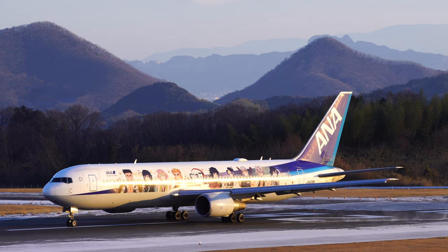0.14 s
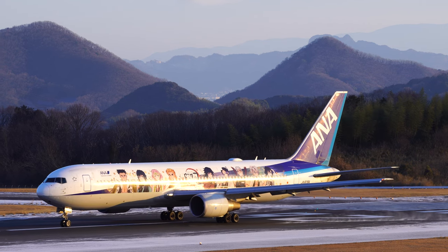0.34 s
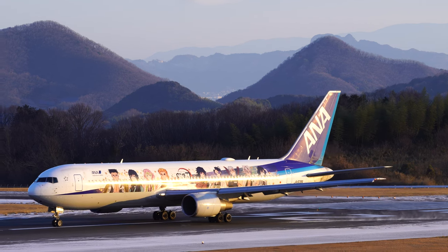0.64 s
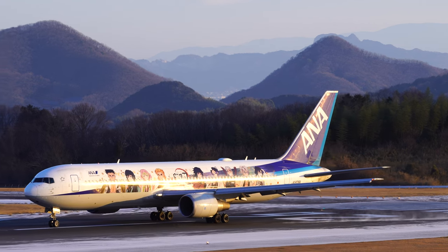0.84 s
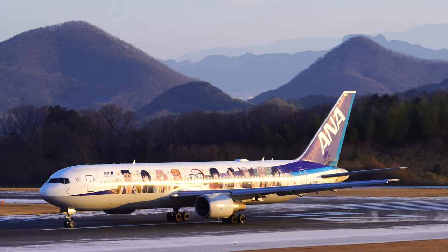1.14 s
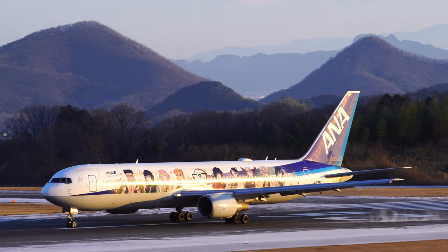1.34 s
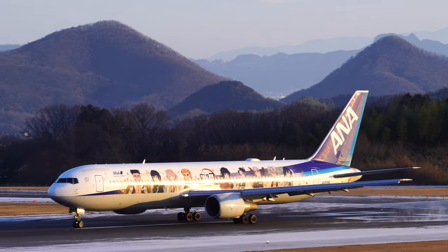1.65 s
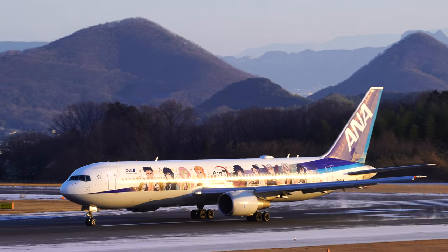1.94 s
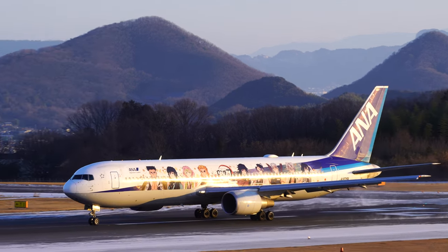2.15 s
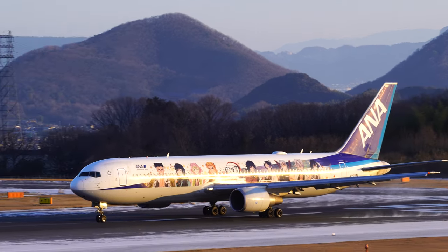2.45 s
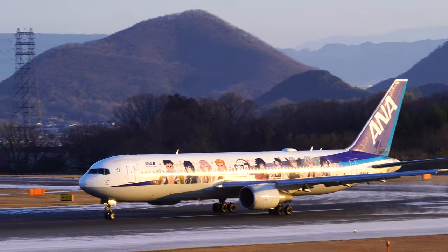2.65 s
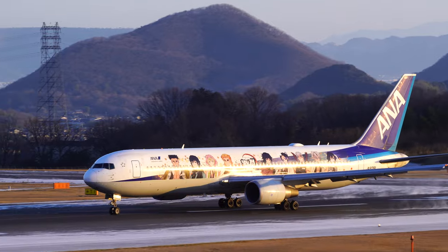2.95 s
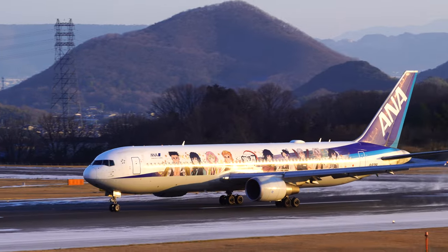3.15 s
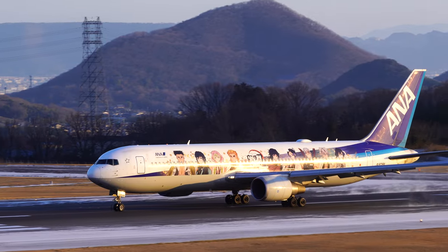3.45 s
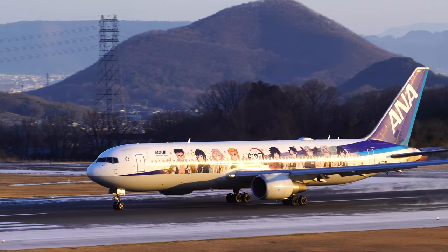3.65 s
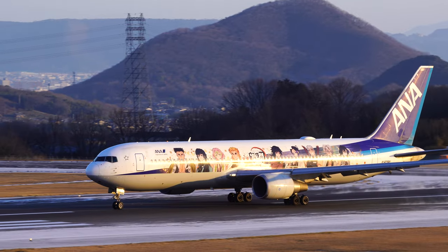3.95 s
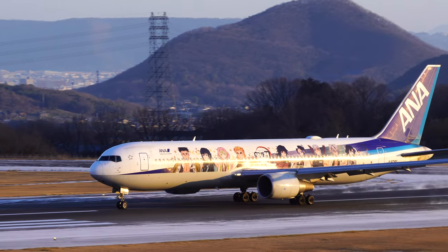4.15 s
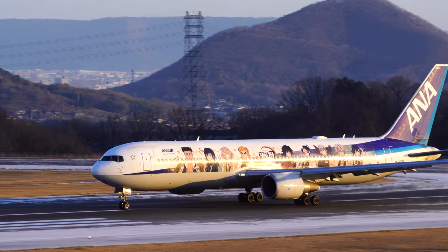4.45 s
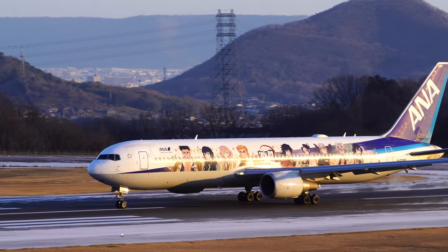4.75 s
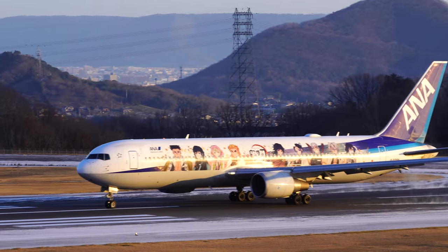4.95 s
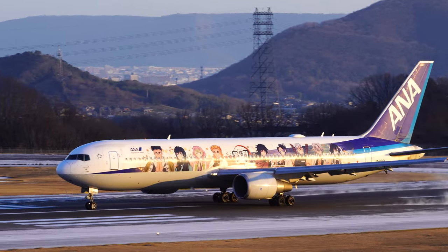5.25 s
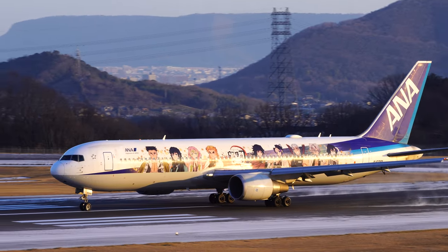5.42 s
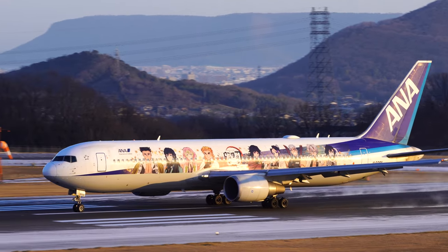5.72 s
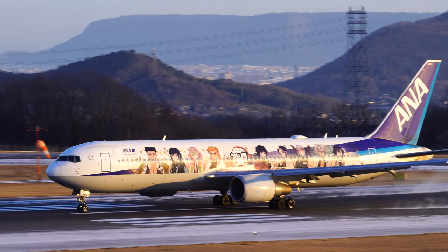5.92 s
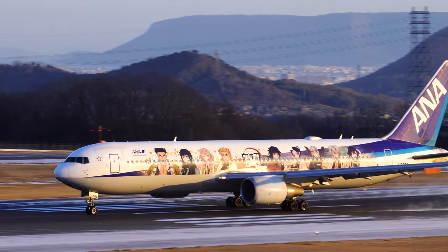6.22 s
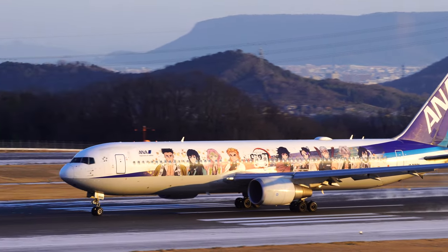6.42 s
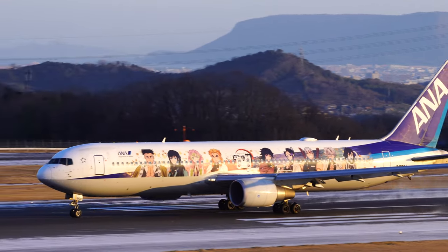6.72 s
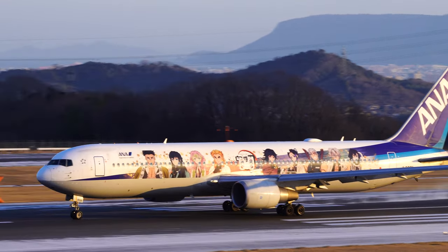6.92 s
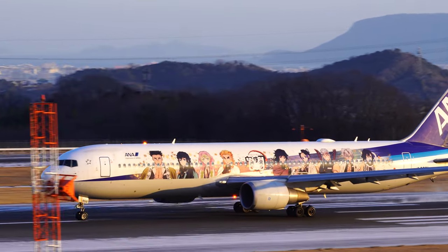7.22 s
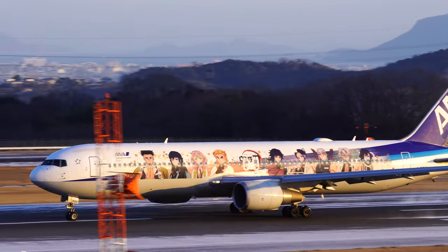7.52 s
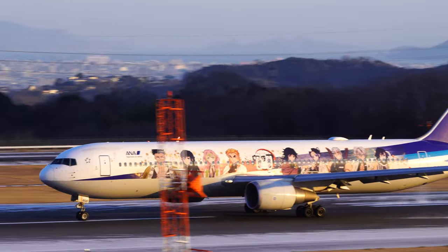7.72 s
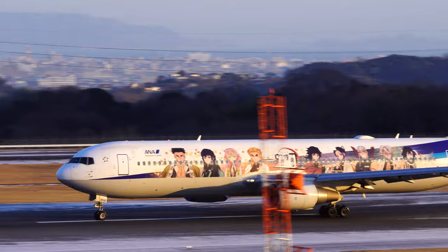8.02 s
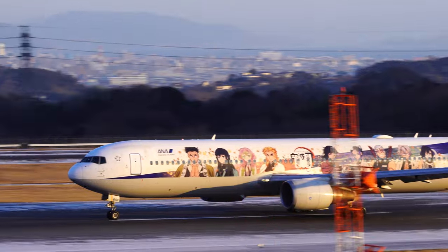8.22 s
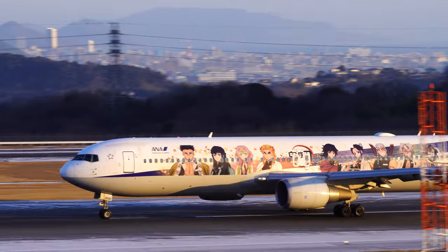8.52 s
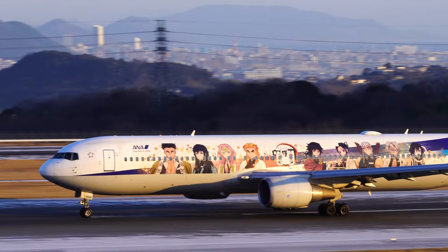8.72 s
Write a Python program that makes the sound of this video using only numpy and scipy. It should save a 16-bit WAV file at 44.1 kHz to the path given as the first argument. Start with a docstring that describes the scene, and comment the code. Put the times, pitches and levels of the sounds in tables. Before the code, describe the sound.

Outdoors across an open airfield, a jet airliner holds a high, fluttering engine whine over soft rushing air and a thin whistle. The throttles open; the whine surges, pulses hard and slides upward, then fades beneath a fuller, darker exhaust roar with low rumble. Heard from a distance by one microphone, mono, with very faint hiss.

```python
"""An open airfield, across which a distant twin-engine airliner opens its throttles. Turbulent mixing gives
rumble, jet roar and fan hiss as shaped noise; air absorption and ground echo colour this flow noise.
Harmonic tones of two fans beat against each other and climb, beside a compressor whistle and a shaft
order; eddies smear them all. A limiter ducks under the loudest beats, over faint preamplifier hiss."""
import sys
import numpy as np
from scipy import signal
from scipy.fft import rfft, irfft, next_fast_len
from scipy.io import wavfile
from scipy.ndimage import uniform_filter1d

SR = 44100
rng = np.random.default_rng(int(sys.argv[2]) if len(sys.argv) > 2 else 0)


def master(y):
    """Save y as 16-bit WAV."""
    cut = np.clip(np.atleast_2d(y).T, -1, 1)
    pcm = np.round(cut * 32767)  # scale
    wavfile.write(sys.argv[1], SR, pcm.astype(np.int16))


N = 391166


def amp(db):
    """Decibel law: 20 dB is a tenfold amplitude."""
    return 10 ** (np.asarray(db) / 20)


def unit(x):
    """Normalisation to an rms of 1."""
    return x / np.sqrt(np.mean(x ** 2))


def curves(rows, t):
    """Linear interpolation of each column after the first, at times t."""
    start_s, *columns = np.transpose(rows)
    return [np.interp(t, start_s, column) for column in columns]


def shaped(x, gain_db):
    """Time-varying filtering: short-time spectra times a gain in dB over frequency and time."""
    hz, t, spectra = signal.stft(x, SR, nperseg=1024, boundary="even")
    spectra = spectra * amp(gain_db(hz[:, None], t[None]))
    return signal.istft(spectra, SR, nperseg=1024)[1][:N]


def rush(spectrum, patchy_db):
    """Turbulent noise of rms 1: turbulence on the way makes drifting patches of gain."""
    corner_hz, density_db = np.transpose(spectrum)
    field = rng.standard_normal((513, N // 512 + 2))
    field = uniform_filter1d(field, size=12, axis=0)  # smooth over frequency
    field = unit(uniform_filter1d(field, size=9, axis=1))  # smooth over time

    def gain_db(hz, t):
        steady_db = np.interp(np.log(hz + 1), np.log(corner_hz), density_db, -120, -120)
        return steady_db + patchy_db * field[:, :t.size]

    return unit(shaped(rng.standard_normal(N), gain_db))


# Preamplifier noise spectrum. Each row: frequency in Hz, relative density in dB per Hz.
SELF_NOISE_SPECTRUM = [(20, -27), (5000, -4), (11000, 1), (15000, -7.5)]


def self_noise():
    """Electronic noise: a faint, mostly treble hiss added before the limiter."""
    return amp(-87) * rush(SELF_NOISE_SPECTRUM, patchy_db=.3)


# Low rumble spectrum. Each row: frequency in Hz, relative density in dB per Hz.
RUMBLE_SPECTRUM = [(12, -43), (20, -9.5), (54, 0), (76, 0), (103, -1), (178, -12.5), (230, -9.5),
                   (300, -36.5), (510, -120)]


def rumble():
    """Low-frequency flow noise, of rms 1."""
    return rush(RUMBLE_SPECTRUM, patchy_db=0.5)


# Fan hiss spectrum. Each row: frequency in Hz, relative density in dB per Hz.
HISS_SPECTRUM = [(900, -41), (1400, 0.5), (1900, 5), (2400, 0), (3000, -4.5), (4300, -16.5), (5000, -25.5),
                 (5900, -36.5), (7700, -55.5), (9500, -96)]


def fan_hiss():
    """Broadband fan noise, of rms 1."""
    return rush(HISS_SPECTRUM, patchy_db=0.6)


# Fan speed. Each row: time in seconds, blade tone midway between both fans in Hz.
FAN_SPEED = [(0, 1521.5), (.3, 1537), (.6, 1540.6), (2.0, 1540.6), (2.55, 1545), (3.15, 1556), (3.4, 1585),
             (3.6, 1637), (3.9, 1735), (4.8, 1984), (5.1, 2047), (5.4, 2091), (6.0, 2143), (6.77, 2167),
             (7.5, 2194), (8.87, 2207)]


def blade_hz(t):
    """Blade passing frequency: it follows the fan speed."""
    return curves(FAN_SPEED, t)[0]


# Exhaust roar spectra at idle and at thrust. Each row: frequency in Hz, relative density in dB per Hz.
IDLE_SPECTRUM = [(150, -62), (260, -15.5), (420, -8), (525, 2), (690, -1.5), (1100, -0.5), (1500, -5.5),
                 (2200, -30), (3000, -66)]
THRUST_SPECTRUM = [(150, -51), (260, -17.5), (355, -14.5), (560, -1), (800, -4.5), (1170, -7),
                   (1600, -13.5), (2200, -36), (3000, -66.5)]
# Upper roar that comes and goes. Each row: time in seconds, brightness in dB per octave.
ROAR_BRIGHTNESS = [(0, 2.5), (1.0, 3.5), (1.4, 0), (2.7, -0.5), (3.1, 1), (7.0, -1), (7.6, -4), (8.87, -6)]


def exhaust_roar(t):
    """Jet mixing noise: an equal-power crossfade to a darker spectrum as thrust rises."""
    thrust = np.clip((blade_hz(t) - 1750) / 380, 0, 1)
    idle = np.sqrt(1 - thrust) * rush(IDLE_SPECTRUM, patchy_db=0.75)
    full = np.sqrt(thrust) * rush(THRUST_SPECTRUM, patchy_db=0.62)

    def tilt_db(hz, s):
        octaves = np.clip(np.log2((hz + 1) / 720), -.45, .9)
        return curves(ROAR_BRIGHTNESS, s)[0] * octaves

    return shaped(idle + full, tilt_db)


# Air flow before the path. Each row: time in seconds, then gains of rumble, exhaust roar and fan hiss in dB.
FLOW_LEVELS = [(0, -41.5, -26.5, -29), (.8, -42.5, -27.5, -29.5), (1.5, -40, -25.5, -29),
               (2.4, -40, -26, -27), (2.8, -42, -27, -27.5), (3.7, -40, -26, -27.5), (4.3, -38.5, -25, -28),
               (4.9, -35.5, -20.5, -26.5), (5.6, -32, -19, -26), (6.4, -34, -19, -28),
               (7.4, -34.5, -18, -28), (8.2, -35.5, -20, -28.5), (8.87, -33.5, -21, -29)]


def flow(t):
    """Superposition of flow noises: rumble, exhaust roar and fan hiss."""
    rumble_db, roar_db, hiss_db = curves(FLOW_LEVELS, t)
    return amp(rumble_db) * rumble() + amp(roar_db) * exhaust_roar(t) + amp(hiss_db) * fan_hiss()


# Clarity of the air path. Each row: time in seconds, gain from the air at 6 kHz in dB.
AIR_CLARITY = [(0, 5), (.5, 0.5), (1.4, 4), (2.1, -4.5), (2.8, -6), (3.15, 5), (3.4, 2), (3.58, 10),
               (3.9, 3.5), (5.2, 0.5), (6.0, 0.5), (7.0, 2.5), (8.87, 5.5)]
# the ground echo first lifts a band, then cancels it as the aircraft draws near
ECHO_HZ, ECHO_LIFT_DB, ECHO_TURN_S, ECHO_SINK_DB_PER_S = 1540, 4.5, 2.1, 1.4


def path_db(hz, t):
    """Absorption and interference: air acts as frequency squared, up to 6.3 kHz; the echo colours one band."""
    air_db = curves(AIR_CLARITY, t)[0] * np.minimum(hz / 6000, 1.05) ** 2
    echo_db = ECHO_LIFT_DB - ECHO_SINK_DB_PER_S * np.maximum(t - ECHO_TURN_S, 0)
    echo_band = np.exp(-(np.log((hz + 1) / ECHO_HZ) / 0.11) ** 2)
    return air_db + echo_db * echo_band


def scatter(width_hz):
    """Spectral broadening: complex noise of rms 1 whose spectrum falls away slowly beyond width_hz."""
    keep = np.exp(-2 * np.pi * width_hz / SR)
    noise = rng.standard_normal(N) + 1j * rng.standard_normal(N)
    z = signal.lfilter([1], [1, -keep], noise)
    z = uniform_filter1d(z.real, size=200) + 1j * uniform_filter1d(z.imag, size=200)
    return z / np.sqrt(np.mean(np.abs(z) ** 2))


def tone(phase, db, halo_db, width_hz):
    """Scattering by eddies on the long air path: a sine of rms level db, plus a halo relative to it."""
    direct_and_halo = 1 + amp(halo_db) * scatter(width_hz)
    return np.sqrt(2) * amp(db) * np.imag(np.exp(1j * phase) * direct_and_halo)


def phase_of(hz):
    """Phase as the running integral of frequency, in radians."""
    return 2 * np.pi * np.cumsum(hz) / SR


SHAFT_PEAK_S, SHAFT_PEAK_DB, SHAFT_RISE_DB_PER_S, SHAFT_FALL_DB_PER_S = 5.6, -35, 14, 140


def shaft_order(t):
    """Shaft-order tone just above the blade tone: it swells as the blade tips near sonic speed."""
    rise_db = SHAFT_RISE_DB_PER_S * (SHAFT_PEAK_S - t)
    fall_db = SHAFT_FALL_DB_PER_S * (t - SHAFT_PEAK_S)
    db = SHAFT_PEAK_DB - np.maximum(rise_db, fall_db)
    return tone(phase_of(blade_hz(t)) * 41 / 38, db, halo_db=-3, width_hz=12)


# Compressor whistle. Each row: time in seconds, frequency in Hz, direct tone level in dB.
WHISTLE = [(0, 4025, -48), (.45, 4042, -49), (1.1, 4042, -46), (1.75, 4045, -61), (2.3, 4046, -50),
           (3.0, 4085, -53), (3.28, 4125, -45), (3.5, 4215, -52), (4.0, 4440, -78), (4.6, 4700, -120)]


def compressor_whistle(t):
    """Sum-frequency generation: a whistle, and a weaker tone at its sum with the blade tone."""
    hz, db = curves(WHISTLE, t)
    phase = phase_of(hz)
    whistle = tone(phase, db, halo_db=-8, width_hz=16)
    sum_tone = tone(phase + phase_of(blade_hz(t)), db - 24.5, halo_db=-2, width_hz=10)
    return whistle + sum_tone


# Mismatch of the two engines. Each row: time in seconds, faster blade tone minus slower in Hz.
FAN_GAP = [(0, 9.72), (.5, 9.18), (.75, 7.81), (1, 9.71), (2.6, 9.77), (2.95, 2.15), (3.25, 2.02),
           (3.4, 10.05), (3.82, 8.47), (3.95, 19.71), (4.42, 21.76), (4.56, 25.16), (4.68, 19.97),
           (5.12, 12.2), (5.38, 9.8), (5.46, 4.5), (6.0, 4.6), (6.15, 1.6), (8.87, 1.0)]
OPPOSED_S = -.01  # a moment when the two tones are in opposition


def fan_phases(t):
    """Beating: the faster fan gains one whole cycle from one opposition to the next."""
    mean = phase_of(blade_hz(t))
    gap_hz, = curves(FAN_GAP, t)
    lead = np.pi * (np.cumsum(gap_hz) / SR - gap_hz[0] * OPPOSED_S + .5)
    return mean + lead, mean - lead


# Blade tone. Each row: time in seconds, direct level of both fans together in dB,
# faster fan over slower in dB, second harmonic under the tone in dB before the fans' shares.
BLADE_LEVELS = [(0, -18.5, 3.5, 23), (.3, -18, -8, 17), (.55, -24, 1, 13.5), (1.2, -22.5, -2, 11),
                (1.45, -20, 1.5, 20), (2.15, -16.5, -7, 28), (2.4, -20.5, -2.5, 13.5),
                (2.75, -18.5, -2.5, 22), (3.03, -24, 6, 13.5), (3.17, -17.5, -9, 8.5),
                (3.32, -14.5, 3.5, 14), (3.62, -9.5, 8.5, 17), (3.84, -11, 9, 19), (3.95, -21, 1.5, 13),
                (4.08, -12.5, 9, 20.5), (4.24, -16, 8, 21.5), (4.33, -26, 3.5, 16.5),
                (4.5, -20.5, -1.5, 25), (4.65, -25, 3, 22), (5.25, -24, 8.5, 26.5), (5.41, -35, 4, 22),
                (5.6, -26, -7, 26), (6.1, -39, 7.5, 21), (7.0, -38, -7, 26), (7.34, -27, 10, 33),
                (7.5, -34.5, -13, 28), (8.87, -42, -8, 27.5)]
# Third harmonic. Each row: time in seconds, level in dB before the fans' shares.
THIRD_HARMONIC = [(0, -45.5), (.6, -52.5), (1.7, -58), (2.9, -56), (3.35, -56), (3.58, -37), (3.72, -47),
                  (4.1, -56.5), (4.5, -64), (5.1, -78), (5.6, -90)]
LOADED_HZ = 1640  # blade tone at which the highest harmonics flare


def blade_tones(t):
    """Harmonic series of two fans: close frequencies beat, and upper harmonics flare as the fans load up."""
    pair_db, faster_over_db, second_under_db = curves(BLADE_LEVELS, t)
    third_db, = curves(THIRD_HARMONIC, t)
    fade_db = -.11 * np.abs(blade_hz(t) - LOADED_HZ)
    harmonics = (
        (2, pair_db - second_under_db),
        (3, third_db),
        (4, third_db - 21.5 + .05 * fade_db),
        (5, third_db - 43 + fade_db),
    )
    out = np.zeros(N)
    for phase, side in zip(fan_phases(t), (1, -1)):
        share_db = -10 * np.log10(1 + amp(-2 * side * faster_over_db))  # this fan's part of the power
        db = pair_db + share_db
        halo_db = -11 - .6 * (db + 23)  # the scattered part is steadier than the direct path
        out += tone(phase, db, halo_db=halo_db, width_hz=7)
        for k, level_db in harmonics:
            # the share counts twice: the louder fan carries most of the harmonics
            out += tone(k * phase, level_db + 2 * share_db, halo_db=-3.5, width_hz=20)
    return out


def scene():
    """Superposition over the field: flow noise through air and ground, plus the engine tones."""
    t = np.arange(N) / SR
    flow_noise = shaped(flow(t), path_db)
    return (flow_noise + shaft_order(t) + compressor_whistle(t) + blade_tones(t))[None]


def limiter(x):
    """Level compression: gain lags behind the short-term level by a 26 ms time constant."""
    level_db = 10 * np.log10(np.abs(uniform_filter1d(x ** 2, size=400)) + 1e-12)
    need_db = -1.1 * np.maximum(level_db + 13, 0)  # above -13 dB
    keep = np.exp(-1 / (.026 * SR))
    gain_db = signal.lfilter([1 - keep], [1, -keep], need_db)
    return x * amp(gain_db)


TOP_HZ = 15700  # upper band limit


def band_limit(x):
    """Linear filtering: a low cut around 30 Hz and a 300 Hz wide slope down to the top limit."""
    size = next_fast_len(N + SR)
    hz = np.fft.rfftfreq(size, 1 / SR)
    low_cut = hz ** 2 / (hz ** 2 + 30 ** 2)
    band = low_cut * np.clip((TOP_HZ - hz) / 300, 0, 1)
    lead_in = SR // 2  # mirrored sound at both ends avoids edge clicks
    padded = np.pad(x, (lead_in, size - N - lead_in), "reflect")
    return irfft(rfft(padded) * band, size)[lead_in:][:N]


def record(dry):
    """Signal chain: preamplifier hiss, then limiting, then band limits."""
    return band_limit(limiter(dry[0] + self_noise()))[None]


dry = scene()
out = record(dry)
master(out)
```